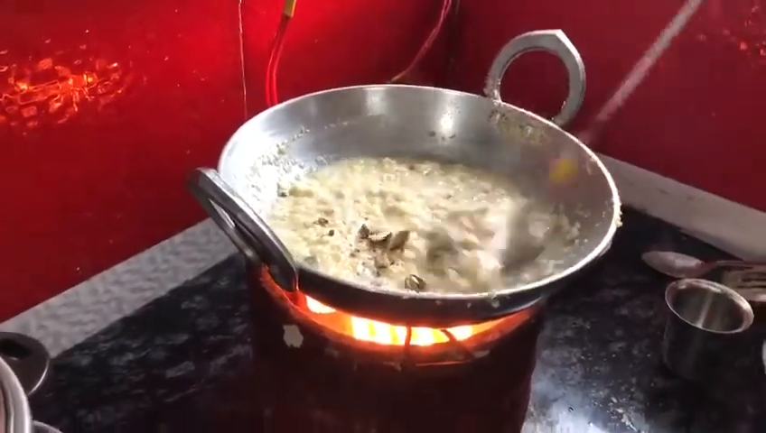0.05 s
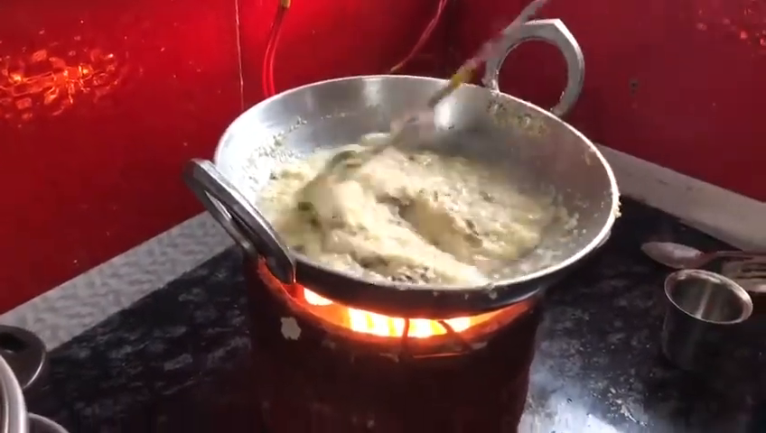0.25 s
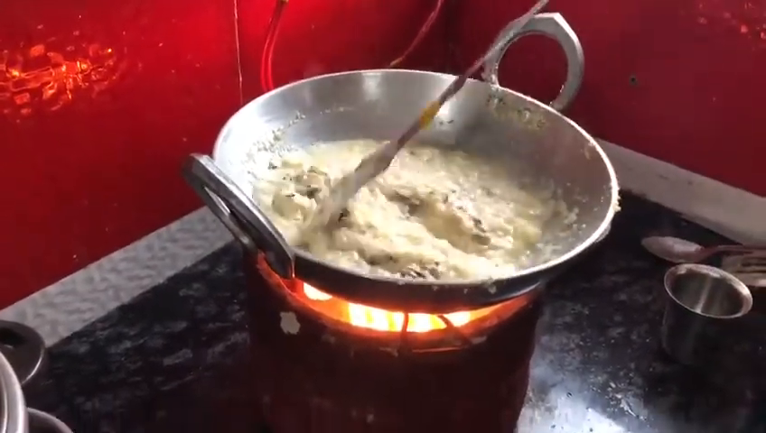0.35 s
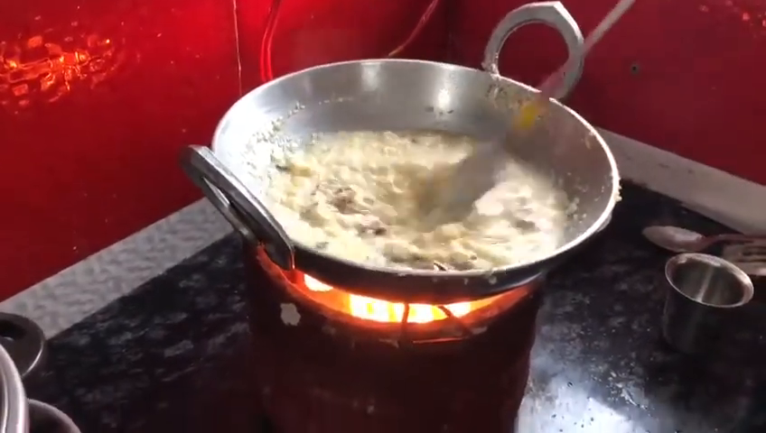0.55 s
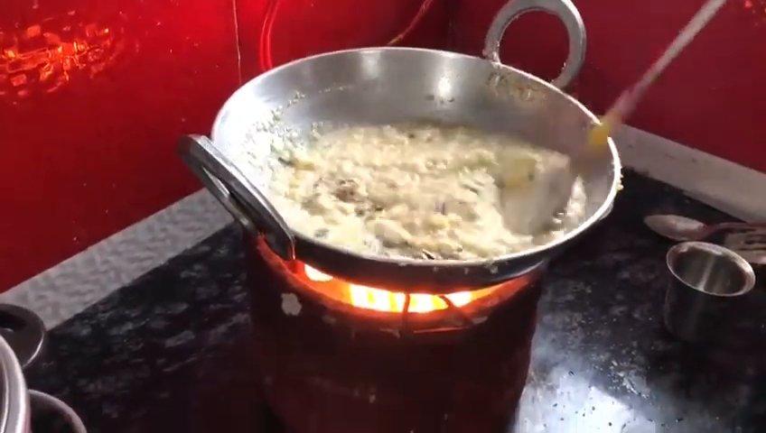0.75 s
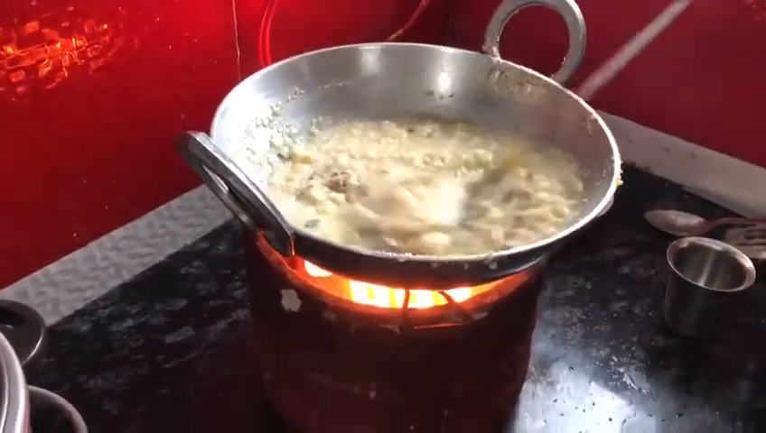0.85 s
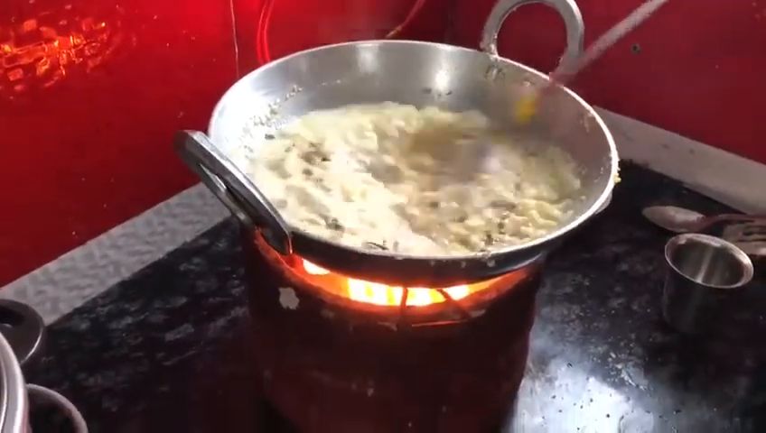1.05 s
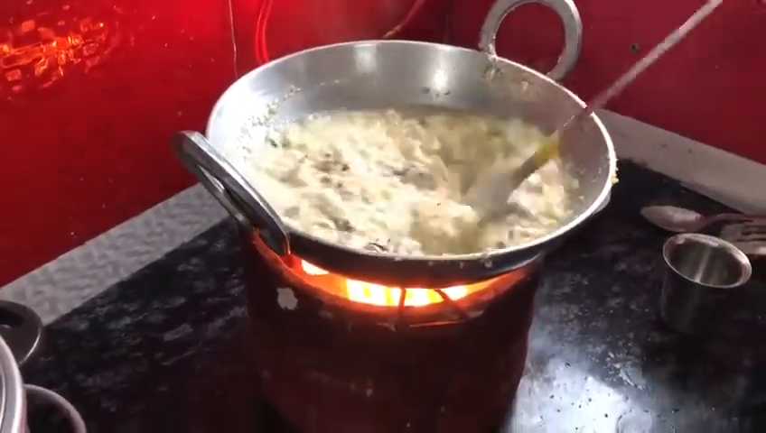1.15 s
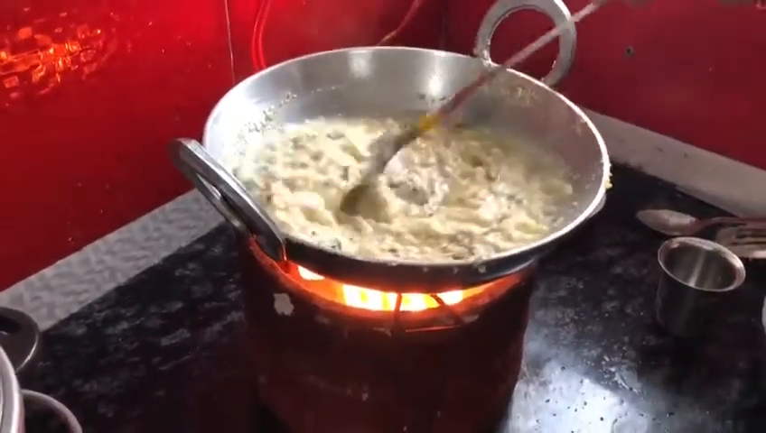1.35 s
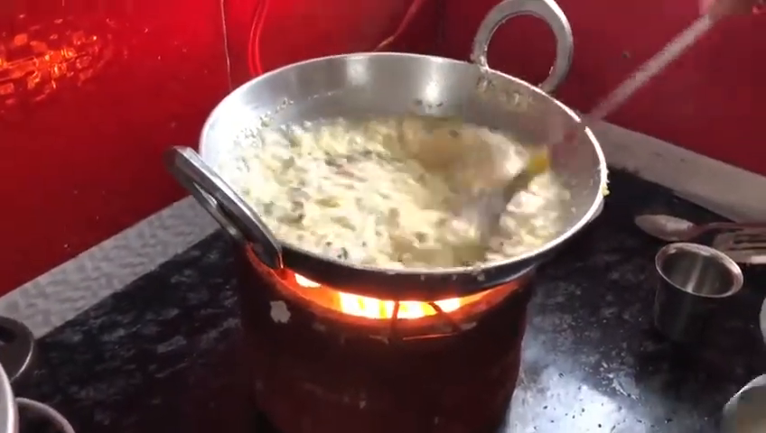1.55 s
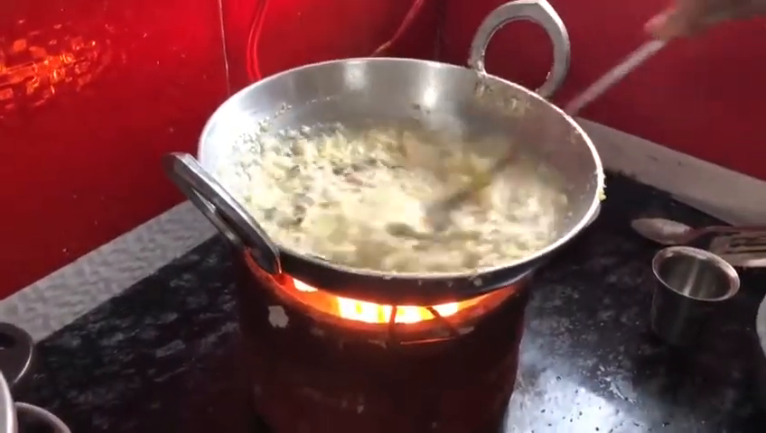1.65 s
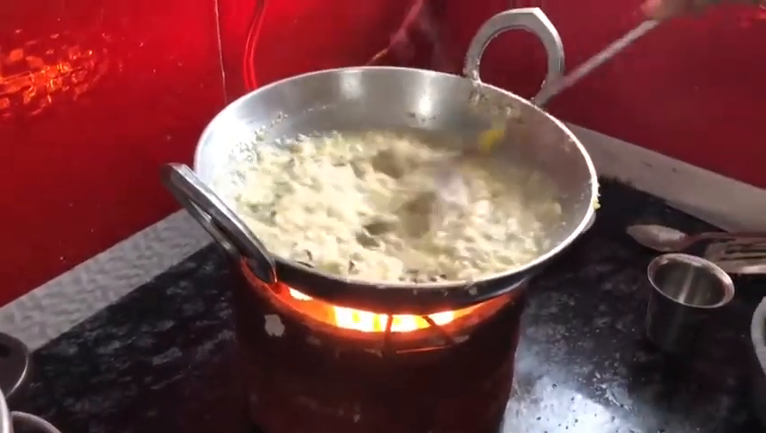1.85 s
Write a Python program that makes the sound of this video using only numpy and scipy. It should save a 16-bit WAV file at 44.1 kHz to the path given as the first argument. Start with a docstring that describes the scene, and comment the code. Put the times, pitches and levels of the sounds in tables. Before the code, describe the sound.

Spatula stirring thick food in a metal pan: short squeaky scrapes, a fast run of bright loud clanks, quieter sizzling spits and soft thumps, and a final clank, over low burner rush in a small echoing kitchen, miked close in mono.

```python
"""A steel spatula stirs thick food in a thin metal pan over a burner in a hard-walled kitchen.
The fading tail of an earlier clank and short drags of the blade lead to a quick run of ringing clanks.
Then the food spits and smacks between more drags, pings and low thumps, and a last clank ends the scene.
Clanks, pings and thumps are fading tones, clanks also have a noisy knock; the tail, drags and spits
are shaped noise. Burner hum and rush run throughout."""
import sys
import numpy as np
from scipy import signal
from scipy.fft import rfft, irfft
from scipy.io import wavfile

SR = 44100
rng = np.random.default_rng(int(sys.argv[2]) if len(sys.argv) > 2 else 0)


def unload_wav(signal):
    """Save mono or channel-first audio to the path in sys.argv[1] as 16-bit WAV at rate SR, clipped to [-1, 1]."""
    wavfile.write(
        sys.argv[1],
        SR,
        np.round(np.clip(np.atleast_2d(signal).T, -1, 1) * 32767).astype(np.int16),
    )


N = 83790   # length of the scene in samples

# All levels are relative: the steps in the functions add to them.
# Steady rush of burner and air: [f/Hz, level/dB]
RUSH_SPECTRUM = [(76, -35.5), (130, -6.5), (233, -13), (468, -19.5), (534, -16.5), (1130, -22), (1250, -23),
                 (1370, -19.5), (1720, -22), (11700, -52), (15200, -78), (22000, -120)]
# Deep rumble of the burner: [f/Hz, level/dB]
RUMBLE_SPECTRUM = [(15, -33.5), (35, -4), (70, -10), (110, 0.5), (140, -14.5), (200, -43)]
# Steady tones of the burner: [f/Hz, level/dB]
HUM_TONES = [(49, -62.5), (100, -50.5)]
# Echo of the kitchen: [f/Hz, time to fade by 60 dB t60/s, level/dB]
ROOM_BANDS = [(148.8, 0.98, 5.5), (400, 0.57, 3.5), (1190, 0.66, -3.5), (2900, 0.51, -1.5),
              (6040, 0.61, -3), (9650, 0.13, -2)]
# Small pings, low thumps and a low ring of the pan: [t/s, f/Hz, level/dB, t60/s]
PING_EVENTS = [(.0, 4290, -52, 0.42), (.212, 139, -27.5, 0.12), (.225, 196.3, -33, 0.83),
               (.945, 240, -36, 0.034), (1.066, 1280, -34.5, 0.024), (1.077, 4300, -45.5, 0.035),
               (1.222, 3620, -56, 0.12), (1.277, 3680, -53.5, 0.073), (1.405, 2000, -46.5, .06),
               (1.575, 884, -42.5, 0.075), (1.66, 232, -51, 0.87), (1.712, 3040, -36.5, 0.028),
               (1.745, 1910, -46.5, 0.13)]
# The food spits or smacks: [t/s, treble level/dB, low level/dB, t60/s, click level/dB, brightest f/Hz]
SPIT_EVENTS = [(0.52, -38.5, -77, 0.037, -46, 6700), (0.571, -39.5, -66, 0.026, -33, 6070),
               (0.662, -52, -64.5, 0.04, -56, 7500), (.812, -42, -37, 0.062, -58, 5280),
               (0.913, -40, -43, 0.062, -53, 4300), (1.028, -39, -41.5, 0.04, -42.5, 7500),
               (1.199, -54, -52.5, .05, -53, 6680), (1.277, -61.5, -59, 0.045, -57, 7000),
               (1.364, -38.5, -38, 0.075, -34, 5120), (1.412, -45, -58, .04, -45, 9570),
               (1.429, -36, -64, 0.033, -47, 3470), (1.533, -65.5, -97, 0.035, -63, 8940),
               (1.575, -49.5, -44.5, 0.054, -56, 4900), (1.712, -43.5, -43, 0.061, -44, 2940),
               (1.818, -51.5, -77, 0.046, -46, 7100)]
# Bright noise of a spit: [f/Hz, level/dB]
SPIT_SPECTRUM = [(1470, -41.5), (2500, -5), (4190, -7), (4650, -4), (6760, -13), (8260, -13.5),
                 (11700, -17), (15200, -57), (22000, -120)]
# The fading tail of an earlier clank (first row), then the blade drags along the wall:
# [start t/s, loudest t/s, end t/s, pan level/dB, hiss level/dB,
# squeal level/dB, squeal from f/Hz, squeal to f/Hz]
STROKE_EVENTS = [(.0, -0.001, 0.053, -52, -57, -59, 1100, 1000),
                 (.042, .055, .09, -49, -51.5, -41.5, 2188, 1910),
                 (.06, .105, 0.13, -42.5, -47, -39.5, 1850, 1544),
                 (0.149, 0.198, 0.23, -47.5, -54, -47, 3426, 3150),
                 (0.496, 0.508, 0.59, -47, -60, -61, 4000, 4160),
                 (0.841, 0.926, 0.99, -41, -45, -48, 1573, 1508),
                 (1.393, 1.442, 1.458, -48, -44.5, -59.5, 3280, 4280),
                 (1.592, 1.59, 1.611, -43, -37, -47, 3800, 3540),
                 (1.63, 1.706, 1.777, -49.5, -53, -53, 2016, 1912),
                 (1.842, 1.881, 1.9, -53.5, -49.5, -54.5, 1500, 1570)]
# Sound of the scraped pan wall: [f/Hz, level/dB]
WALL_SPECTRUM = [(180, -52), (300, -15), (528, -17), (704, -7.5), (1240, -7.5), (1510, -8.5), (2030, -9),
                 (3500, -13.5), (4550, -53.5), (7700, -120)]
# Hiss of grit on the blade: [f/Hz, level/dB]
HISS_SPECTRUM = [(1470, -52.5), (2500, -25.5), (3090, -6.5), (3960, 1), (5260, -2), (5790, -1.5),
                 (9580, -6.5), (11700, -19.5), (15200, -45), (22000, -120)]
# The blade strikes the pan: [t/s, blade ring level/dB, pan ring level/dB, knock level/dB,
# treble tilt/dB per octave]
CLANK_EVENTS = [(.2000, -12, -18, -5.5, 0), (.2050, -18, -29, -15.5, 2.5), (0.2201, -18.5, -25, -14, -4.5),
                (.2405, -11, -19.5, -5, -3.5), (.2445, -25, -25.5, -9, -3), (1.8982, -25.5, -17, -4, -0.5)]
# Ringing modes of the blade: [f/Hz, level/dB, t60/s, spread of the cluster/Hz]
BLADE_MODES = [(3095, -11, 0.71, 12), (3127, 1.5, 0.22, 14), (3144, -7, 0.09, 140), (3360, -13.5, 0.2, 13),
               (3775, -12, 0.12, 240), (4130, -21, .2, 60), (4580, -19, 0.103, 230),
               (5216, -14.5, 0.42, 45), (5285, -12, 0.27, 50), (5800, -30, 0.052, 120),
               (6320, -15.5, .2, 79), (7000, -21.5, .12, 230), (7520, -23, 0.26, 120), (8890, -29, .2, 74),
               (9920, -28.5, 0.31, 110), (10420, -38.5, .16, 100)]
# Ringing modes of the pan: [f/Hz, level/dB, t60/s, spread of the cluster/Hz]
PAN_MODES = [(330, -23, 0.17, 33), (421.5, -16, .13, 55), (544, -10.5, 0.11, 70), (749, -11, 0.18, 90),
             (955, -4, 0.11, 90), (1248, -3, 0.29, 110), (1475, 1, 0.064, 39), (1640, -15, 0.25, 110),
             (1870, -8, 0.59, 62), (2080, -8, 0.23, 58), (2282, -15, 0.063, 130), (2615, -3.5, .15, 200),
             (2886, -15, 0.13, 100)]
# Dull knock at the contact: [f/Hz, width/Hz, level/dB]
KNOCK_BANDS = [(900, 337, 5), (1298, 380, 6), (1504, 200, 7), (3400, 1500, 5), (6060, 4700, -37)]

RUSH_DB, RUMBLE_DB = -54.5, -56
HUM_WAVER_DB, HUM_WAVER_HZ = 1, 3.9
ROOM_DB, ROOM_ONSET_S = -2, 0.0032
BLADE_ROOM_DB, SOFT_ROOM_DB, PING_ROOM_DB = -3, -4.5, -13   # how much goes into the echo
PING_ATTACK_S = 0.001
SMACK_HZ, SMACK_WIDTH_HZ = 856.4, 470
SPIT_ATTACK_S, SPIT_WIDTH_HZ, SPIT_BROAD_DB = 0.0017, 1530, -7
GRIT_PER_S, GRIT_SPREAD_DB, GRIT_CLUMP_DB, GRIT_CLUMP_HZ = 3000, 1, 1.5, 55.5
PATCHY_DB, PATCHY_HZ = 1.5, 40
EDGE_DB, FALL_DB = -9, -6.5   # start and end of a stroke, under its loudest
SQUEAL_WIDTH_HZ = 246
CHATTER_S = 0.0033   # a blow is a short burst of contacts
UNEVEN_DB, CONTACT_HZ = 1.5, 8500
DUCK_ABOVE_DB, DUCK_SHARE, DUCK_RELEASE_DB_PER_S = -13.5, 0.16, 52   # gain control
CUTOFF_HZ = 12500


def amp(db):
    """Turns decibels into a plain factor."""
    return 10 ** (np.asarray(db, float) / 20)


def rms_one(x):
    """Scales a sound to an rms (average strength) of 1."""
    return x / np.sqrt(np.mean(x ** 2) + 1e-20)


def at_hz(points, hz, col=1):
    """Reads a table column at any frequency, along a log frequency scale."""
    p = np.array(points)
    return np.interp(np.log(hz), np.log(p[:, 0]), p[:, col])


def coloured(x, spectrum):
    """Shapes a sound by a spectrum; rms 1."""
    hz = np.arange(len(x) // 2 + 1) * SR / len(x) + 1   # the 1 keeps the logarithm finite
    return rms_one(irfft(rfft(x) * amp(at_hz(spectrum, hz)), len(x)))


def filtered(x, order, hz, kind="low"):
    """Keeps the lows, the highs or a band of a sound."""
    return signal.sosfilt(signal.butter(order, hz, kind, fs=SR, output="sos"), x)


def peak(x, hz, width_hz):
    """Resonance with gain 1 on top."""
    r = np.exp(-np.pi * width_hz / SR)
    feedback = [1, -2 * r * np.cos(2 * np.pi * hz / SR), r * r]
    return signal.lfilter([(1 - r * r) / 2, 0, (r * r - 1) / 2], feedback, x + 1e-18)


def clicks(s, gains):
    """Single-sample pushes at the given times."""
    out = np.zeros(N)
    out[np.minimum((np.asarray(s) * SR).astype(int), N - 1)] = gains
    return out


def drift(rate_hz):
    """Slow random wander: noise smoothed twice, rms 1."""
    r = np.exp(-2 * np.pi * rate_hz / SR)
    wander = signal.lfilter([1], [1, -2 * r, r * r], rng.standard_normal(N + SR))
    return rms_one(wander[SR:])   # the first second lets the filter settle


def patchy(x):
    """Each third of an octave flickers on its own; rms 1."""
    edges = 300 * 2 ** np.arange(0, 5.5, 1 / 3)
    out = np.zeros(N)
    for band in zip(edges, edges[1:]):
        out += amp(PATCHY_DB * drift(PATCHY_HZ)) * filtered(x, 2, band, "band")
    return rms_one(out)


def grit():
    """Dense slips of uneven strength and random direction, stronger and weaker in clumps."""
    slips = rng.random(N) < GRIT_PER_S / SR
    uneven_db = GRIT_SPREAD_DB * np.minimum(rng.exponential(1, N), 5)
    clump_db = GRIT_CLUMP_DB * drift(GRIT_CLUMP_HZ)
    return slips * amp(uneven_db + clump_db) * rng.choice([-1, 1], N)


def burner():
    """Steady rush and rumble of shaped noise, with hum tones that waver in level and phase."""
    t = np.arange(N) / SR
    out = amp(RUSH_DB) * coloured(rng.standard_normal(N), RUSH_SPECTRUM)
    out += amp(RUMBLE_DB) * coloured(rng.standard_normal(N), RUMBLE_SPECTRUM)
    for hz, db in HUM_TONES:
        level = np.sqrt(2) * amp(db + HUM_WAVER_DB * drift(HUM_WAVER_HZ))
        out += level * np.sin(2 * np.pi * hz * t + 0.5 * drift(4.6))
    return out


def kitchen(x):
    """Diffuse echo off hard walls: noise that dies band by band."""
    t, tail = np.arange(SR) / SR, np.zeros(SR)
    edges = 100 * 2 ** np.arange(0, 7.1, 0.5)   # half octaves
    white = rng.standard_normal((2, SR))   # neighbouring bands take turns with the two noises
    for k, (low, high) in enumerate(zip(edges, edges[1:])):
        hz = np.sqrt(low * high)
        band = filtered(white[k % 2], 2, [low, high], "band")
        t60 = at_hz(ROOM_BANDS, hz)
        fade = amp(at_hz(ROOM_BANDS, hz, col=2) - 60 * t / t60)
        tail += band * fade * np.sqrt(2 * np.log(1000) / t60 / SR)   # evens out long and short fades
    tail *= 1 - np.exp(-t / ROOM_ONSET_S)
    return amp(ROOM_DB) * signal.fftconvolve(x, tail)[:N]


def pings():
    """Pings, thumps and a low pan ring as single damped tones with a soft start."""
    t, out = np.arange(N) / SR, np.zeros(N)
    for s, hz, db, t60 in PING_EVENTS:
        age = np.maximum(t - s, 0)
        attack = 1 - np.exp(-age / PING_ATTACK_S)
        out += attack * amp(db - 60 * age / t60) * np.sin(2 * np.pi * hz * age)
    return out


def spits():
    """A click, then a puff of bright noise and a wet low smack that die fast."""
    t, out = np.arange(N) / SR, np.zeros(N)
    bright = coloured(grit(), SPIT_SPECTRUM)
    low = peak(rng.standard_normal(N), SMACK_HZ, SMACK_WIDTH_HZ)
    low = rms_one(peak(low, SMACK_HZ, SMACK_WIDTH_HZ))
    for s, treble_db, low_db, t60, click_db, hz in SPIT_EVENTS:
        age = np.maximum(t - s, 0)
        shape = (1 - np.exp(-age / SPIT_ATTACK_S)) * amp(-60 * age / t60)
        puff = amp(SPIT_BROAD_DB) * bright + rms_one(peak(bright, hz, SPIT_WIDTH_HZ))
        out += shape * (amp(treble_db) * puff + amp(low_db) * low)
        click = clicks([s], amp(click_db + 13.5))
        out += peak(peak(click, hz, 4000), hz, 6000)
    return out


def tail_and_drags():
    """An earlier clank's tail fades, then drags swell and fade: slips as pan noise, hiss and gliding squeal."""
    t, out = np.arange(N) / SR, np.zeros(N)
    wall = patchy(coloured(grit(), WALL_SPECTRUM))
    hiss = patchy(coloured(grit(), HISS_SPECTRUM))
    narrow = rms_one(filtered(grit(), 2, SQUEAL_WIDTH_HZ / 2))
    for start, top, end, pan_db, hiss_db, squeal_db, from_hz, to_hz in STROKE_EVENTS:
        times = [start - 0.006, start, top, end, end + 0.024]
        shape = amp(np.interp(t, times, [-40, EDGE_DB, 0, FALL_DB, -40]))
        shape = shape * (t > start - 0.006) * (t < end + 0.014)
        glide_hz = np.interp(t, [start, end], [from_hz, to_hz])
        # multiplying by a sine lifts the narrow noise up to the gliding pitch
        squeal = np.sqrt(2) * narrow * np.sin(2 * np.pi * np.cumsum(glide_hz) / SR)
        out += shape * (amp(pan_db) * wall + amp(hiss_db) * hiss + amp(squeal_db) * squeal)
    return out


def blows(s, db):
    """Each blow is a burst of contacts that dies within milliseconds; one row a blow."""
    age = np.arange(400) / SR
    burst = rng.standard_normal((len(s), len(age))) * age * np.exp(-2 * age / CHATTER_S)
    out = np.zeros((len(s), N + len(age)))
    for k, i in enumerate((s * SR).astype(int)):
        out[k, i:i + len(age)] = amp(db[k]) * burst[k] / np.sqrt(np.sum(burst[k] ** 2))
    return out[:, :N]


def ring(modes, s, db, tilt_db, size=5):
    """Every mode is a cluster of close partials; each blow drives them by its tilt, a little unevenly."""
    out = np.zeros(N)
    for k, (hz, level_db, t60, spread_hz) in enumerate(modes):
        sign = (-1) ** (k // 3)
        r = amp(-60 / (t60 * SR))   # fade from one sample to the next
        for offset in np.linspace(-1, 1, size) + rng.normal(0, 0.15, size):
            force_db = db + level_db - 5.5 * abs(offset) + tilt_db * np.log2(hz / 3000)
            force_db = force_db + rng.normal(0, UNEVEN_DB, len(s))
            force = clicks(s, 0.38 * sign * amp(force_db))
            w = 2 * np.pi * (hz + offset * spread_hz) / SR
            out += signal.lfilter([0, np.sin(w)], [1, -2 * r * np.cos(w), r * r], force + 1e-18)
    return out


def knocks(s, knock_db, tilt_db):
    """The burst of contacts shakes a few broad, dull resonances."""
    hit, out = blows(s, knock_db), np.zeros(N)
    for k, (hz, width_hz, db) in enumerate(KNOCK_BANDS):
        push = amp(db + tilt_db * np.log2(max(hz / 3000, 1))) @ hit   # adds up all blows
        out += (-1) ** k * peak(push, hz, width_hz) * SR / (2 * np.pi * width_hz)
    return filtered(out, 4, 600, "high")


def clanks():
    """Blade and pan ring, with a short knock at the contact; little bass leaves the thin pan."""
    s, blade_db, pan_db, knock_db, tilt_db = np.transpose(CLANK_EVENTS)
    knock = knocks(s, knock_db, tilt_db)
    pan = filtered(ring(PAN_MODES, s, pan_db, tilt_db), 4, 280, "high") + knock
    blade = filtered(ring(BLADE_MODES, s, blade_db, tilt_db), 2, 2000, "high")
    return blade, filtered(pan, 2, CONTACT_HZ)


def scene():
    """Adds all sources, the echo of all but the burner, and the burner itself; one channel."""
    blade, pan = clanks()
    soft = tail_and_drags() + spits()
    tones = pings()
    into_room = pan + amp(BLADE_ROOM_DB) * blade + amp(SOFT_ROOM_DB) * soft + amp(PING_ROOM_DB) * tones
    return (blade + pan + soft + tones + kitchen(into_room) + burner())[None]


def record(dry):
    """Gain control ducks after loud blows, peaks are rounded, the top is cut."""
    ramp = DUCK_RELEASE_DB_PER_S * np.arange(N) / SR
    # the level jumps up with each peak and then falls steadily
    level_db = np.maximum.accumulate(20 * np.log10(np.abs(dry) + 1e-6) + ramp, axis=1) - ramp
    target_db = -DUCK_SHARE * np.maximum(level_db - DUCK_ABOVE_DB, 0)
    duck_db = signal.lfilter([0.003], [1, -0.997], target_db)   # smooths the gain changes
    rounded = 1.2 * np.tanh(dry * amp(duck_db) / 1.2)
    return signal.sosfilt(signal.cheby2(14, 60, CUTOFF_HZ, fs=SR, output="sos"), rounded)


dry = scene()
out = record(dry)
unload_wav(out)
```